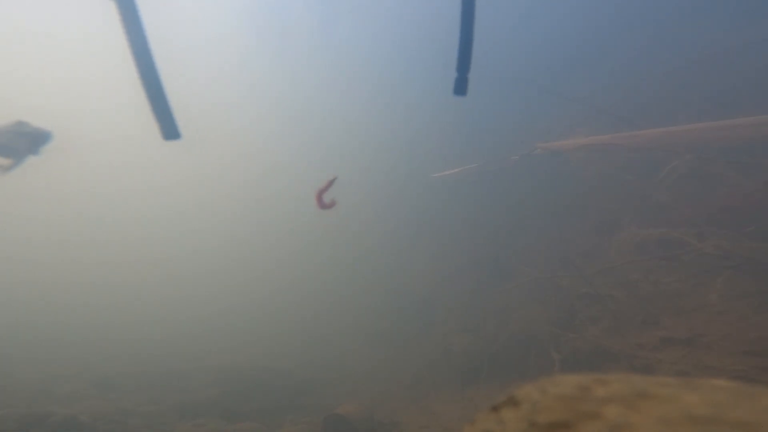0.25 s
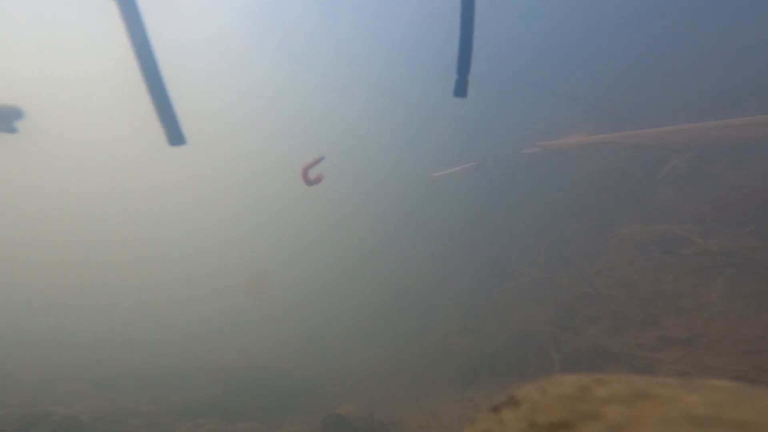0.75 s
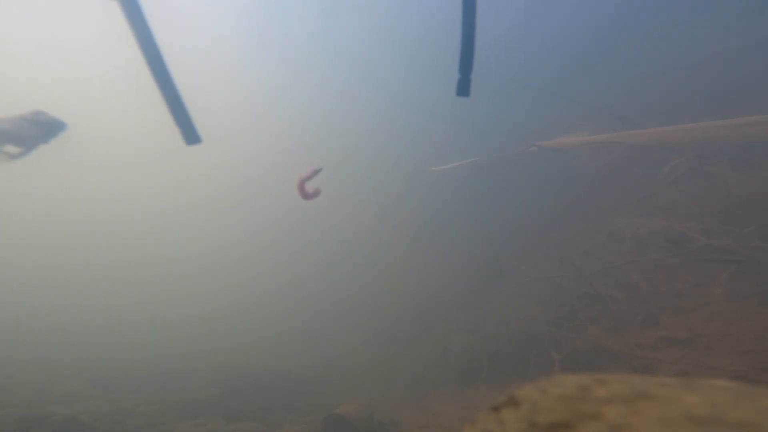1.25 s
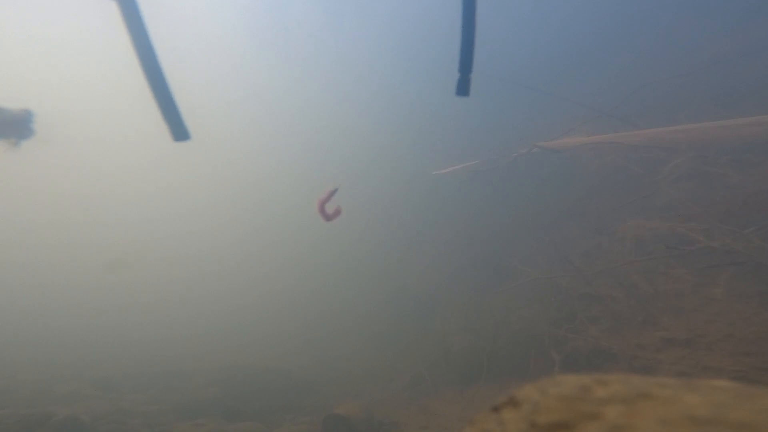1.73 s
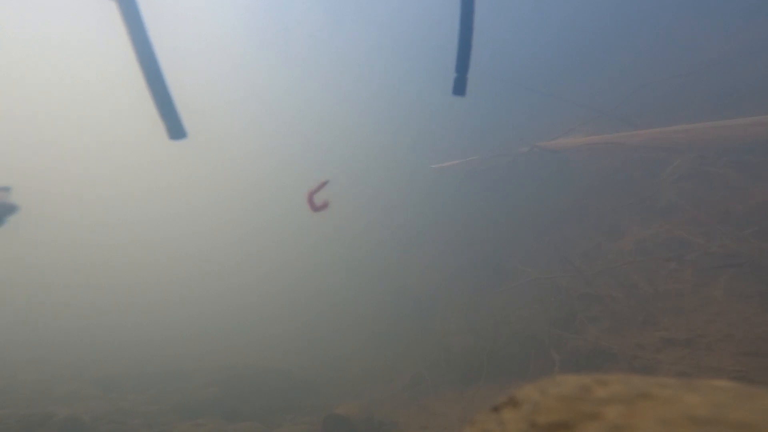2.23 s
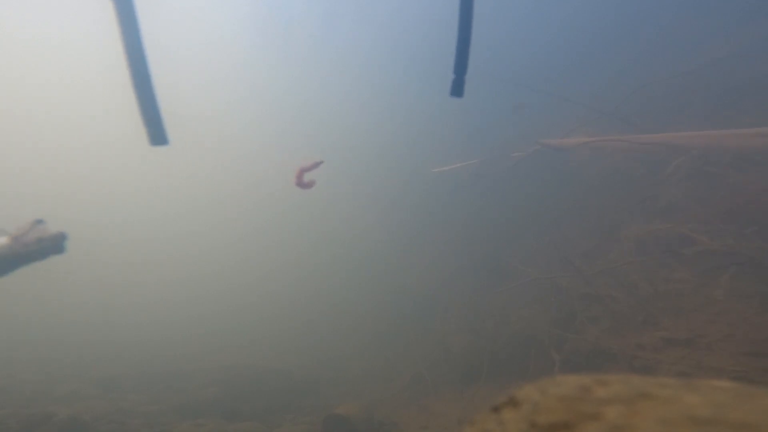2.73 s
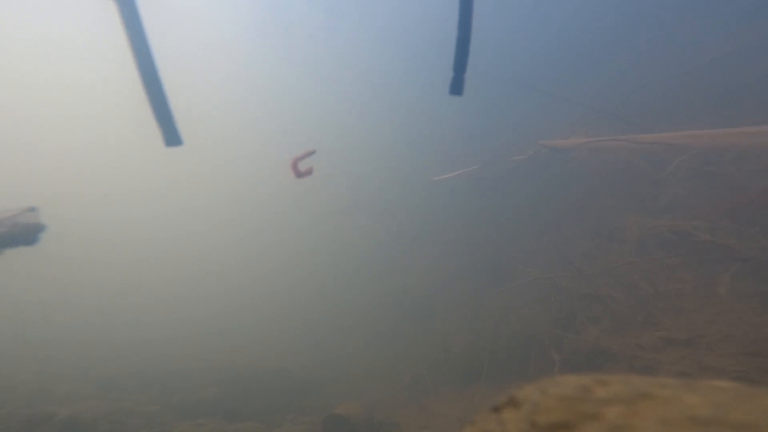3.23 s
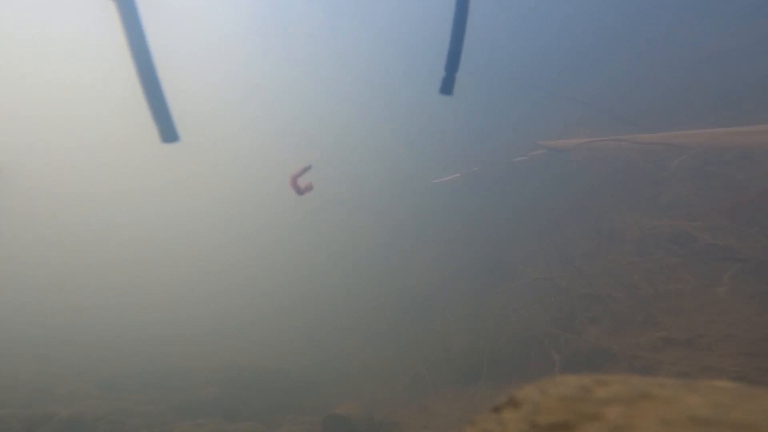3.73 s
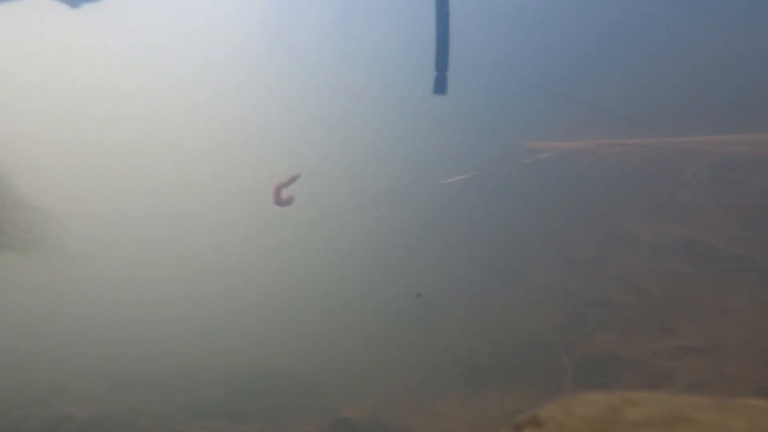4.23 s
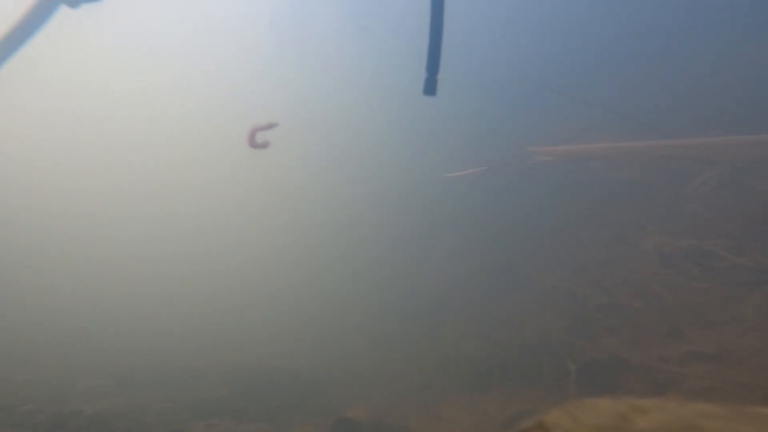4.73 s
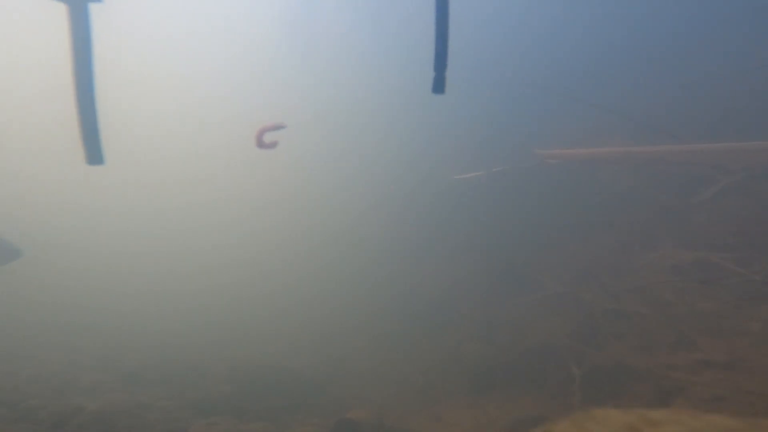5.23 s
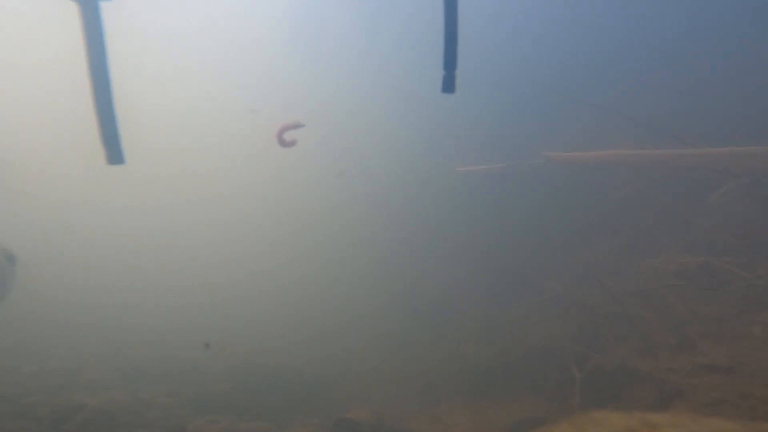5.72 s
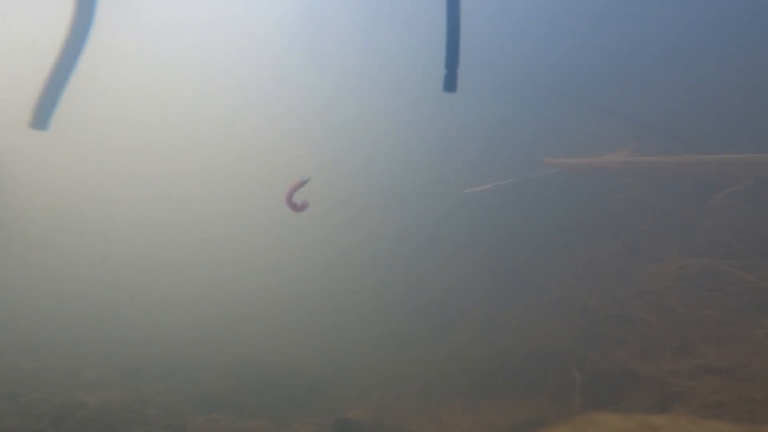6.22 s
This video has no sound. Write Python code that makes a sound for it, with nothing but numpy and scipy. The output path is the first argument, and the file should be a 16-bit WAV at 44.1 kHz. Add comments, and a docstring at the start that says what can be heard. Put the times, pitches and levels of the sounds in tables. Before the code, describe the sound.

Underwater, grit and stones knock and scrape a sealed camera housing, sparse at first with hollow pings, then bursting into loud clipped thuds.

```python
"""Grit and stones tap and scrape the sealed housing of a camera hung in a shallow stream. Short noise bursts and
rubbing noise ring its wall, seam and drum modes, and the loudest moments clip. A hollow part of the rig
pings four times, as a bank of decaying sines. The mount sways on a wandering low tone and shudders in
low noise. Underneath lie a muffled rush of shaped noise and a thin electronic whine of wavering sines."""
import sys
import numpy as np
from scipy import signal
from scipy.fft import rfft, irfft, next_fast_len
from scipy.io import wavfile
from scipy.ndimage import uniform_filter1d, map_coordinates

SR = 44100
rng = np.random.default_rng(int(sys.argv[2]) if len(sys.argv) > 2 else 0)


def waveform_to_disk(signal):
    """Save audio, clipped to [-1, 1], as 16-bit WAV at the path in sys.argv[1]."""
    frames = np.transpose(np.atleast_2d(signal))
    scaled = np.clip(frames, -1, 1) * 32767
    samples = np.round(scaled).astype(np.int16)
    wavfile.write(sys.argv[1], SR, samples)


N = 285327

# Level of the bed, set by its whine: t/s, level/dB
BED_LEVEL = [(0.0, -82.5), (4.2, -81.5), (4.5, -73), (4.83, -100), (6.47, -86)]
# Spectrum of the rush before levelling: f/Hz, relative density/dB per Hz
RUSH_SPECTRUM = [(35, -52.5), (60, -6), (133, -5.5), (183, 7), (233, -5.5), (507, -14.5), (697, -21),
                 (740, -21.5), (818, -25.5), (1820, -18), (2220, -28.5), (3300, -24.5), (3800, -31),
                 (5890, -26), (7050, -43.5), (9160, -46), (15500, -120)]
# Stereo likeness of the rush: f/Hz, left-right correlation (-1 to 1)
RUSH_LIKENESS = [(60, 0.024), (160, -0.43), (450, 0.45), (900, .1), (1600, 0.71), (2400, .1), (3200, 0.42),
                 (4500, -0.25)]
# Stereo balance of the rush: f/Hz, left minus right level/dB
RUSH_BALANCE = [(60, -4), (150, 1.5), (390, 9), (1010, 6), (2580, -4), (6600, 2.5)]
# Partials of the whine, relative to the whine level: f/Hz, left level/dB, right level/dB
WHINE_PARTIALS = [(5770, 11.5, -8.5), (7700, -12, -18.5), (9610, -7.5, -17.5), (11550, -11.5, -17),
                  (12400, -15.5, -23)]
# Sway of the mount: t/s, level/dB
SWAY_LEVEL = [(0.0, -43), (1.91, -61.5), (2.25, -41), (2.45, -63), (2.9, -44), (4.18, -44), (4.36, -30.5),
              (4.42, -10.5), (4.7, -23.5), (4.79, -17), (5.04, -32.5), (5.33, -8), (5.41, -21),
              (5.46, -21.5), (5.58, -22.5), (5.8, -37.5), (5.91, -61), (6.27, -55.5), (6.43, -16.5),
              (6.47, -19)]
# Pings of the hollow part: t/s, level/dB, time/s until the water has choked the ring by 10 dB, a loss growing
# with the square of time (sign is ignored)
PINGS = [(0.121, -1.5, -0.08), (1.05, -2.5, 0.11), (2.118, -2, 0.14), (4.147, -3, 0.03)]
# Hollow modes, some building late and climbing:
# f/Hz, climb/Hz per s, rise/s, t60/s, left level/dB, right level/dB
HOLLOW_MODES = [(52.6, -0.5, 0.075, 0.56, -10, -8), (322, 1.5, 0.00089, 0.018, -9, -6),
                (557.3, -0.5, 0.0063, 0.091, -2.5, -5.5), (594, -4.5, 0.0037, 0.078, -15.5, -5),
                (692, 593, 0.025, 0.16, -15.5, -11.5), (821, 293, 0.0053, 0.042, 8.5, -7),
                (873, -3, 0.00083, 0.071, -20, -3.5), (927.4, 901.5, 0.015, 0.086, -3, 4.5),
                (1060, -6, 0.012, 0.063, -27.5, -9.5), (1380, -4.5, 0.0032, 0.02, -18, -13.5)]
# Housing wall modes: f/Hz, width/Hz, left level/dB, right level/dB
WALL_MODES = [(134, 40, -6, -3.5), (333, 105, -7.5, -5.5), (456, 51.1, 0.5, 2.5), (506, 76, -4.5, -2),
              (702, 120, -15.5, -14), (1059, 130, -14, -20)]
# Housing seam modes, three coarse and then the finer ones: f/Hz, width/Hz, left level/dB, right level/dB
SEAM_MODES = [(1300, 553, -11.5, -5.5), (1616, 193, 0.5, 5), (1920, 270, -8, -9), (2600, 880, -18.5, -16),
              (3176, 200, -8, -5.5), (3720, 4000, -20.5, -24.5), (4970, 330, -10.5, -21),
              (5370, 440, -21, -27.5), (7500, 600, -36, -36)]
# Drum mode of the back wall: f/Hz, width/Hz, left level/dB, right level/dB
DRUM_MODE = [(250, 19, 3.5, -1.5)]
# Scrapes: full from t/s, hold/s, rise/s, fall/s, tick level/dB, thud level/dB, drum level/dB
SCRAPES = [(0.0, 0.13, .02, .05, -54.5, -45.5, -76.5), (0.214, 0.19, .05, 0.03, -61.5, -52.5, -68.5),
           (0.469, 0.0065, 0.023, 0.31, -50.5, -46.5, -70), (1.738, 0.027, 0.25, 0.05, -67, -53, -75),
           (1.924, .01, 0.058, 0.32, -63, -63.5, -78.5), (2.323, 0.011, 0.073, 0.046, -48.5, -42.5, -67),
           (2.699, 0.067, 0.074, 0.23, -54, -43, -57), (2.918, 0.028, 0.049, 0.095, -78.5, -41, -60),
           (3.25, 0.0033, 0.062, 0.11, -49, -36.5, -62), (3.304, 0.776, 0.041, 0.036, -92, -61.5, -69),
           (4.19, 0.095, 0.09, .04, -53.5, -48, -64.5), (4.372, 0.039, 0.037, 0.11, -22, -11, -10),
           (4.451, 0.052, 0.046, 0.2, -42, -19.5, -27), (4.528, 0.15, 0.042, 0.018, -29.5, -20.5, -31),
           (4.827, 0.013, 0.066, 0.087, -39.5, -28, -29), (5.004, 0.016, 0.035, 0.25, -68, -37.5, -43),
           (5.086, 0.058, 0.039, 0.051, -41, -28, -26), (5.262, .01, 0.031, 0.11, -25, -14.5, -7.5),
           (5.48, 0.091, 0.022, 0.1, -49, -39, -34), (5.615, 0.061, 0.014, 0.16, -51, -41, -29),
           (5.753, 0.025, 0.033, 0.046, -50.5, -31.5, -30.5),
           (5.838, 0.045, 0.018, 0.087, -66.5, -42.5, -39.5), (6, .01, 0.025, 0.025, -58.5, -23.5, -32.5),
           (6.175, 0.016, 0.0055, 0.034, -74.5, -28, -52), (6.229, 0.047, .05, 0.036, -67, -42.5, -34.5),
           (6.331, .01, 0.011, 0.056, -46.5, -26, -31), (6.363, 0.0077, 0.017, 0.055, -51, -29, -16.5)]
# Faint drifting grit, always there: tick level/dB, thud level/dB
DRIFT_DB = (-80.5, -72.5)
# Taps: t/s, blow on the walls level/dB, blow on the seams level/dB
TAPS = [(0.031, -12, -23), (0.107, 6, -1), (0.349, -14.5, -30.5), (0.478, 6, -7), (0.519, -6, -20),
        (0.589, -18.5, -30), (1.534, -30, -32.5), (1.665, -25, -29.5), (1.705, -20.5, -24.5),
        (1.918, -32, -25.5), (2.284, -14, -21), (2.302, -26.5, -19.5), (2.666, -13.5, -27.5),
        (2.717, -25.5, -18), (2.769, -6.5, -22.5), (2.906, -11, -53), (2.951, -13, -32),
        (3.132, -18.5, -22), (3.22, -6, -44), (3.233, 0, -9), (3.264, -2.5, -17), (3.782, -22.5, -28.5),
        (3.8, -25, -32.5), (3.872, -29, -27.5), (4.189, 1, -9.5), (4.252, -5.5, -9.5), (4.282, 4, -3),
        (4.309, -4, -36), (4.341, 21, -6.5), (4.37, 23, 10), (4.421, 17.5, 11.5), (4.436, -2, -0.5),
        (4.602, 8.5, -2), (4.655, 17, 2), (4.669, 22.5, -5.5), (4.827, 3, -27), (4.863, 1.5, -15.5),
        (4.92, -10, -27.5), (5.083, 1, -19), (5.121, 0, -8), (5.138, 4, -5), (5.242, 2, -10),
        (5.27, 16, 2.5), (5.294, 15.5, 5.5), (5.332, 5.5, -3.5), (5.194, -12, -26.5), (5.45, -6.5, -25),
        (5.487, -5, -17.5), (5.545, -14.5, -8.5), (5.624, -4.5, -12.5), (5.739, -2.5, -7.5),
        (5.762, 4, -9.5), (5.841, -5.5, -24.5), (5.986, 2.5, -9), (6.168, 11.5, -9.5), (6.244, -8, -27.5),
        (6.328, 10, -8.5), (6.374, 10, -23)]

WITH_SWAY_DB, WITH_SCRAPE_DB, WITH_PING_DB = -18.5, -6.5, -25  # shudder relative to each cause
SETTLE_S = 0.4  # t60 of the shudder after a ping
EDGE_DB = 30  # gained over a scrape's rise, lost over its fall
THUMP_DB, BEAT_DB = -28.5, -30  # mount and back wall, relative to the blow on the walls
SHARPNESS, EVEN_DB = 0.44, -6  # fine-seam gain, dB per dB that seams minus walls exceeds EVEN_DB
TICK_OWN_PATH = 0.35  # power share of a tap's tick that differs between the microphones
SEAL_HZ = 6800  # the sealed housing lets little through above this
TOP_HZ = 15800  # band limit of the recorder


def amp(db):
    """Decibels to linear gain."""
    return 10 ** (np.asarray(db) / 20)


def unit(x):
    """Scale to an RMS of one."""
    return x / np.sqrt(np.mean(x ** 2) + 1e-20)


def along(points, hz):
    """Interpolate (f/Hz, value) points on a log frequency axis."""
    f, value = np.transpose(points)
    return np.interp(np.log(hz + 1), np.log(f + 1), value)


def curves(rows):
    """One value per sample for each column after the time."""
    s, *columns = np.transpose(rows)
    return [np.interp(np.arange(N) / SR, s, column) for column in columns]


def wobble(rate):
    """A smooth random curve, rate knots a second."""
    knots = rng.standard_normal(int(N * rate / SR) + 4)
    return map_coordinates(knots, [np.arange(N) * rate / SR])


def filtered(x, response):
    """Shape x with a complex response of frequency."""
    m = next_fast_len(N + SR // 2)
    spectrum = rfft(x, m) * response(np.fft.rfftfreq(m, 1 / SR))
    return irfft(spectrum, m)[..., :N]


def bandpass(f, centre, width):
    """Response of one damped resonance."""
    return 1j * f * width / (centre ** 2 - f * f + 1j * f * width)


def ringing(modes, muffle_hz):
    """Causal response of the modes at both microphones; water muffles the treble."""
    def response(f):
        both = sum((-1) ** k * amp([[left], [right]]) * bandpass(f, centre, width)
                   for k, (centre, width, left, right) in enumerate(modes))
        return both / (1 + 1j * f / muffle_hz) ** 2
    return response


def apart(x, own):
    """One shared push plus a power share, own, that reaches each microphone on its own path."""
    return np.sqrt(np.clip(1 - own, 0, 1)) * x[0] + np.sqrt(np.clip(own, 0, 1)) * x[1:]


def stream_rush():
    """The stream's muffled rush: noise in patches of time and pitch, with its own spectrum and stereo image."""
    z = signal.stft(rng.standard_normal((2, N)), nperseg=512)[2]
    patches = uniform_filter1d(rng.standard_normal(z.shape[1:]), size=6, axis=0)
    patches = uniform_filter1d(patches, size=10, axis=1)
    pair = signal.istft(z * amp(3 * unit(patches)), nperseg=512)[1][:, :N]

    def mid_side(hz):
        turn = np.arccos(np.clip(along(RUSH_LIKENESS, hz), -1, 1)) / 2
        return amp(along(RUSH_SPECTRUM, hz)) * [np.cos(turn), np.sin(turn)]

    mid, side = filtered(pair, mid_side)
    stereo = np.array([mid + side, mid - side])
    return unit(filtered(stereo, lambda hz: amp(np.outer([0.5, -0.5], along(RUSH_BALANCE, hz)))))


def electronic_whine():
    """Sine partials share one slight pitch waver and a fluttering level, stronger on the left."""
    waver = np.cumsum(1 + 0.00061 * wobble(32)) / SR
    whine = sum(amp([[left], [right]]) * np.sin(2 * np.pi * hz * waver)
                for hz, left, right in WHINE_PARTIALS)
    return amp(3.7 * wobble(25)) * whine


def background():
    """Rush and whine follow one level curve, with a gain of 26.5 dB on the rush."""
    level_db, = curves(BED_LEVEL)
    return amp(level_db) * (amp(26.5) * stream_rush() + electronic_whine())


def pressure():
    """Gains of tick, thud and drum: every scrape rises, holds and falls."""
    t, gains = np.arange(N) / SR, np.zeros((3, N))
    for s, hold, rise, fall, *db in SCRAPES:
        before = np.maximum(s - t, 0) / max(rise, 0.005)
        after = np.maximum(t - s - hold, 0) / max(fall, 0.005)
        gains += np.outer(amp(db), amp(-EDGE_DB * (before + after)))
    return gains


def mount():
    """The springy mount sways at a low pitch; sway, scrapes and pings make it shudder above that."""
    sway_db, = curves(SWAY_LEVEL)
    t = np.arange(N) / SR
    kicks = sum((t > s) * amp(db + WITH_PING_DB - 60 * np.abs(t - s) / SETTLE_S) for s, db, _ in PINGS)
    shudder = amp(sway_db + WITH_SWAY_DB) + amp(WITH_SCRAPE_DB) * pressure()[1] + kicks

    turns = np.cumsum(28 * amp(0.9 * wobble(4.4))) / SR  # pitch wanders around 28 Hz
    sway = np.sqrt(2) * np.sin(2 * np.pi * turns) * amp(0.9 * wobble(9.3))
    buffet = filtered(rng.standard_normal(N), lambda f: bandpass(f, 38, 20) / (1 + 1j * f / 50))
    sway = sway + amp(-3.5) * unit(buffet)  # the current buffets it

    band = lambda f: bandpass(f, 60, 60)
    rumble = unit(filtered(rng.standard_normal(N), band))
    shaking = filtered(shudder * rumble, band)
    return amp([[-0.6], [0.6]]) * (amp(sway_db) * sway + shaking)  # nearly alike on both sides


def pings():
    """A soft blow sets off the same hollow modes each time, slightly rebalanced; water chokes the ring."""
    out, t = np.zeros((2, N + SR)), np.arange(SR // 2) / SR
    for s, db, choke in PINGS:
        choke_db = 10 * (t / choke) ** 2
        ring = 0
        for hz, climb, rise, t60, left, right in HOLLOW_MODES:
            level_db = np.array([[left], [right]]) + rng.normal(0, 1)
            envelope = amp(level_db - 60 * t / t60 - choke_db) * (1 - np.exp(-t / rise)) ** 2
            ring = ring + envelope * np.sin(2 * np.pi * (hz + climb * t / 2) * t)
        out[:, round(s * SR):][:, :len(t)] += amp(db) * ring
    return out[:, :N]


def grit(rate, spread_db, floor, surge_db):
    """Sparse pushes of uneven size, rate a second, on a bed of rubbing noise, in quick surges."""
    hit = rng.random(N) < rate / SR
    push = hit * amp(spread_db * rng.exponential(size=N).clip(0, 3))
    size = uniform_filter1d(push, size=60)
    return (floor + unit(size)) * amp(surge_db * wobble(45)) * rng.standard_normal((3, N))


def scrape():
    """Grit drags over the housing and keeps its modes going; coarse and fine grains catch different seams."""
    tick_gain, thud_gain, drum_gain = pressure()
    wall_grit = grit(rate=340, spread_db=4.5, floor=0.87, surge_db=2.5)
    coarse_grit = grit(rate=100, spread_db=6, floor=1, surge_db=3.5)
    fine_grit = grit(rate=300, spread_db=5, floor=0.7, surge_db=3)
    thud = filtered(apart(wall_grit, own=0.08), ringing(WALL_MODES, muffle_hz=1500))
    coarse = filtered(apart(coarse_grit, own=0.63), ringing(SEAM_MODES[:3], muffle_hz=5000))
    fine = filtered(apart(fine_grit, own=0.4), ringing(SEAM_MODES[3:], muffle_hz=5000))

    shake = apart(rng.standard_normal((3, N)), own=0.032)
    drum = lambda x: filtered(x, ringing(DRUM_MODE, muffle_hz=425))
    drumming = drum(drum_gain * shake) / drum(shake).std()
    thuds = (thud_gain + amp(DRIFT_DB[1])) * unit(thud)
    ticks = (tick_gain + amp(DRIFT_DB[0])) * unit(coarse + fine)
    return thuds + ticks + drumming


def taps():
    """A short rough contact: a thud in the walls, a tick in the seams, a mount thump and a drum beat."""
    (thud, tick, fine), low = np.zeros((3, 3, N + SR)), np.zeros(N + SR)
    t = np.arange(SR // 5) / SR
    soft = (1 - np.exp(-t / 0.0034)) ** 2
    beat = soft * amp(BEAT_DB - 60 * t / 0.092) * np.sin(2 * np.pi * DRUM_MODE[0][0] * t)
    for s, wall_db, seam_db in TAPS:
        at = slice(round(s * SR), round(s * SR) + len(t))
        rough = rng.standard_normal((2, 3, len(t)))
        push = amp(-60 * t / 0.0011)
        chatter = amp(-1 - 60 * t / 0.026) * rough[0]
        thud[:, at] += amp(wall_db) * (push + chatter)
        tick[:, at] += amp(seam_db - 60 * t / 0.018) * rough[1]
        # sharp taps reach the finer seams
        fine_db = seam_db + SHARPNESS * (seam_db - wall_db - EVEN_DB)
        fine[:, at] += amp(fine_db - 60 * t / 0.016) * rough[1]
        thump_hz = 70 * amp(rng.normal(0, 1.5))
        thump = soft * amp(THUMP_DB - 60 * t / 0.2) * np.sin(2 * np.pi * thump_hz * t)
        low[at] += amp(wall_db) * (thump + beat)
    walls = filtered(apart(thud[:, :N], own=0.12), ringing(WALL_MODES, muffle_hz=1500))
    coarse = filtered(apart(tick[:, :N], own=TICK_OWN_PATH), ringing(SEAM_MODES[:3], muffle_hz=4900))
    finer = filtered(apart(fine[:, :N], own=TICK_OWN_PATH), ringing(SEAM_MODES[3:], muffle_hz=5000))
    return walls + coarse - finer + low[:N]


def scene():
    """Taps and scrapes pass the sealed housing, a steep low-pass; the other layers add directly."""
    seal = lambda f: 1 / (1 - (f / SEAL_HZ) ** 2 + 1j * f / SEAL_HZ) ** 2
    housing = filtered(taps() + scrape(), seal)
    return background() + mount() + pings() + housing


def record(dry):
    """The right capsule hears 2.5 samples late; the input hisses and clips; the band limit cuts the top."""
    late = filtered(dry, lambda hz: np.exp(-2j * np.pi * np.outer([0, 2.5 / SR], hz)))
    hiss = amp(-90.5) * rng.standard_normal((2, N))
    clipped = (late + hiss) / (1 + np.abs(late) ** 40) ** (1 / 40)  # hard knee near full scale
    return filtered(clipped, lambda hz: hz < TOP_HZ)


dry = scene()
out = record(dry)
waveform_to_disk(out)
```